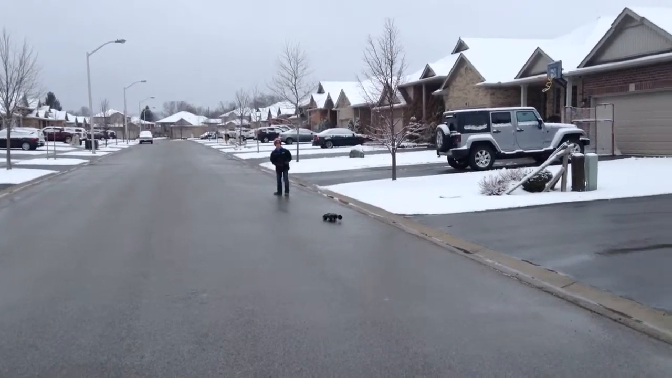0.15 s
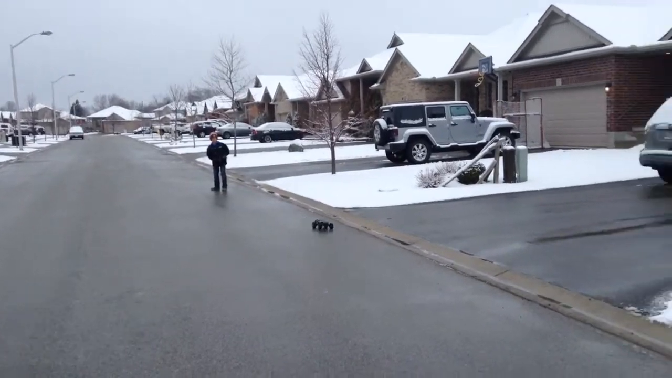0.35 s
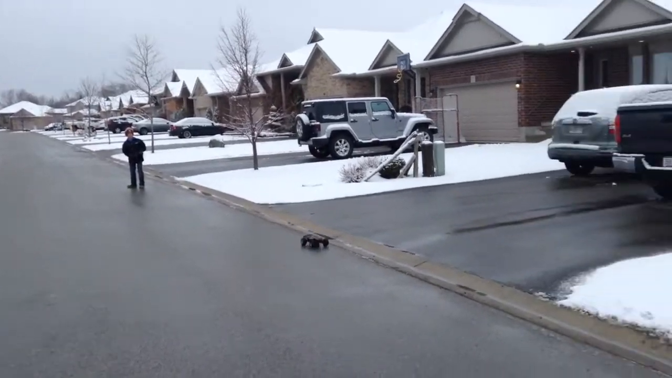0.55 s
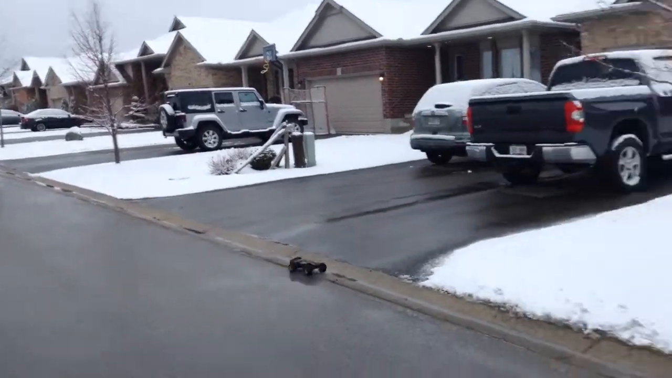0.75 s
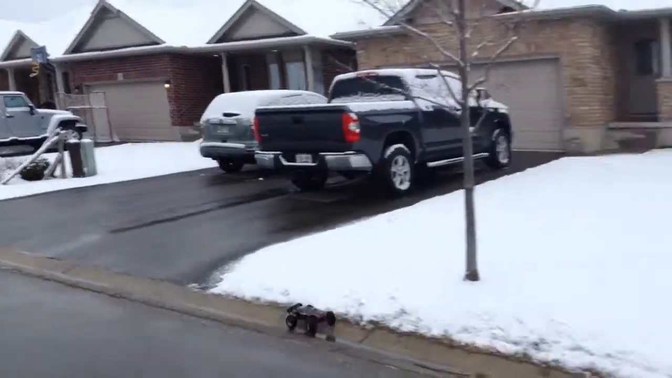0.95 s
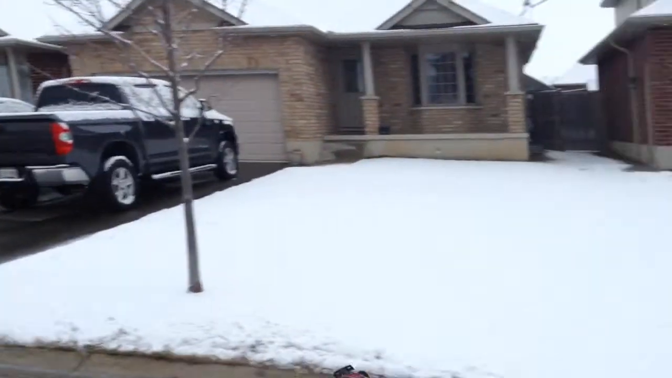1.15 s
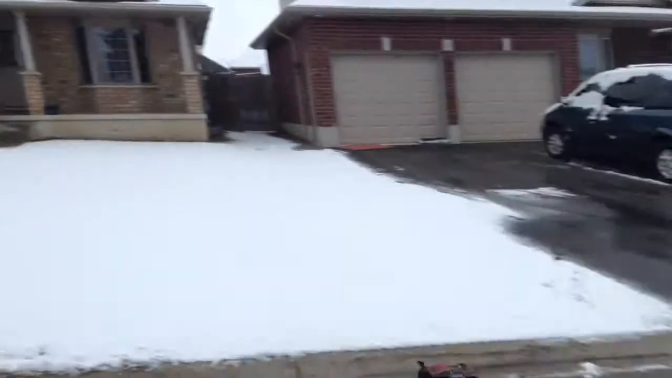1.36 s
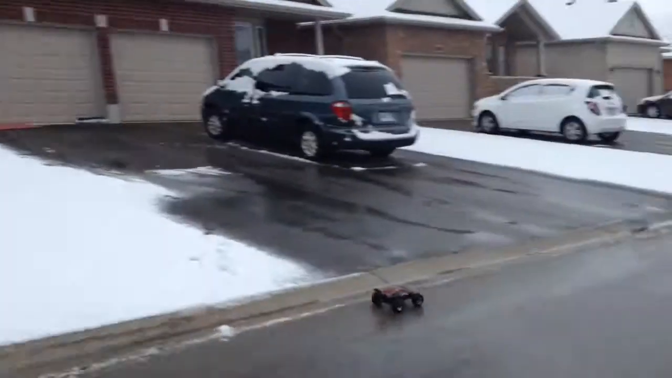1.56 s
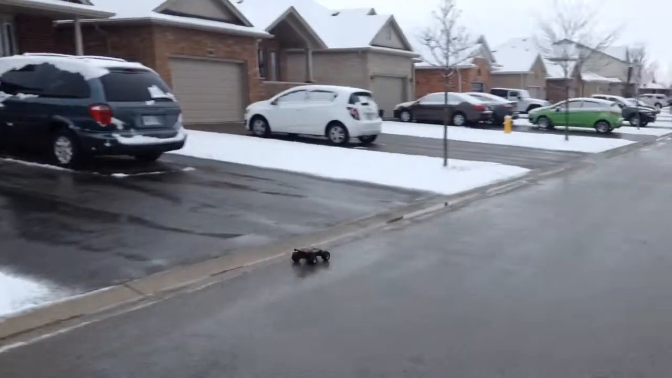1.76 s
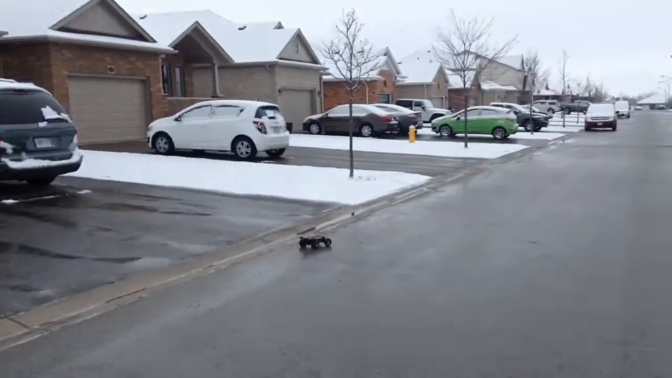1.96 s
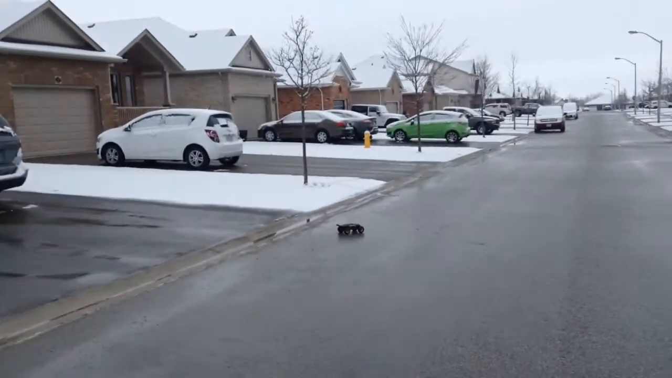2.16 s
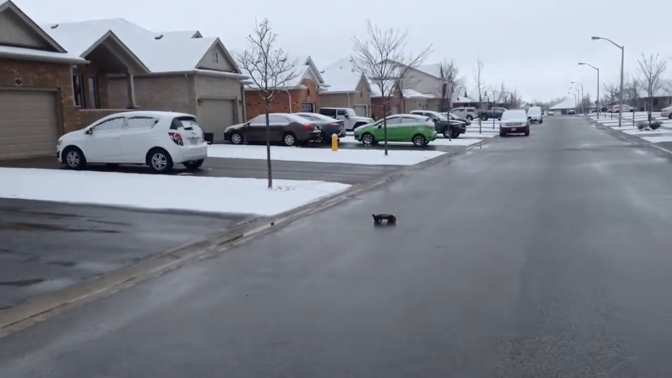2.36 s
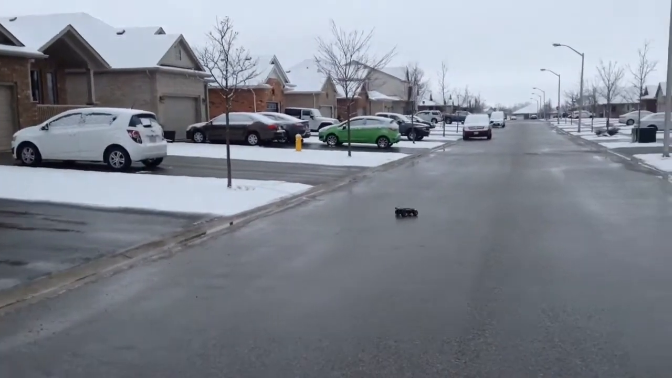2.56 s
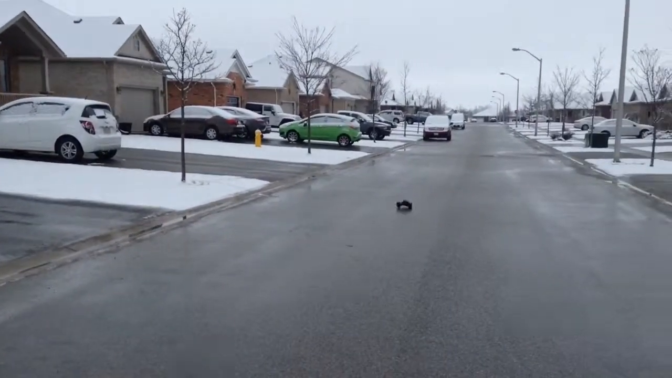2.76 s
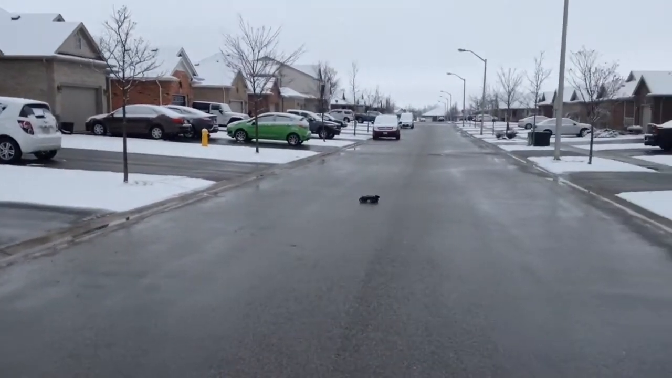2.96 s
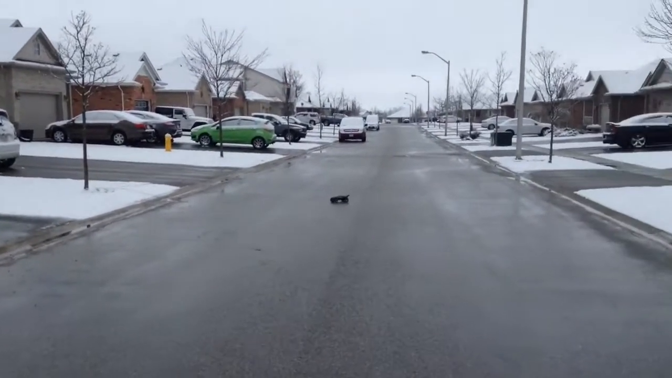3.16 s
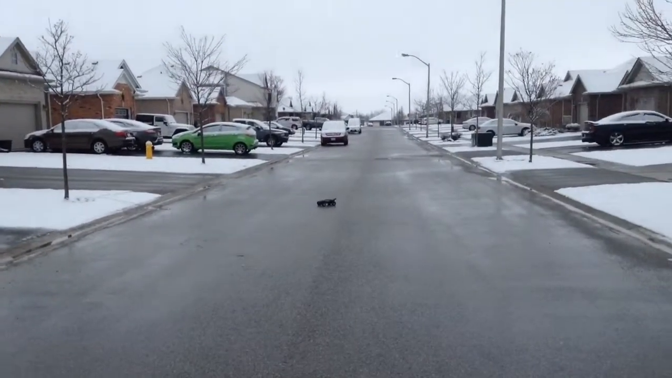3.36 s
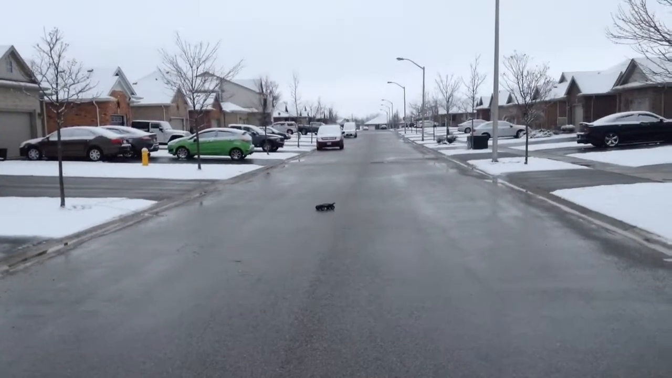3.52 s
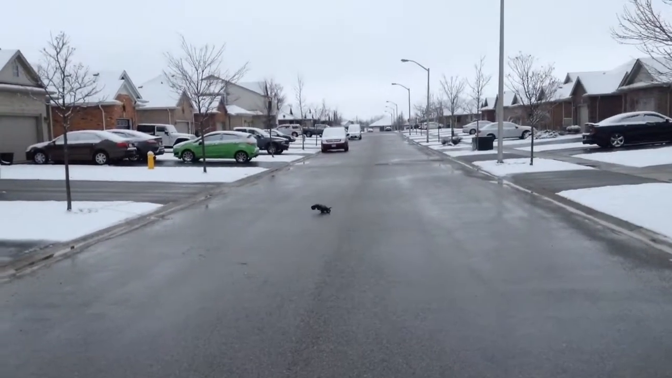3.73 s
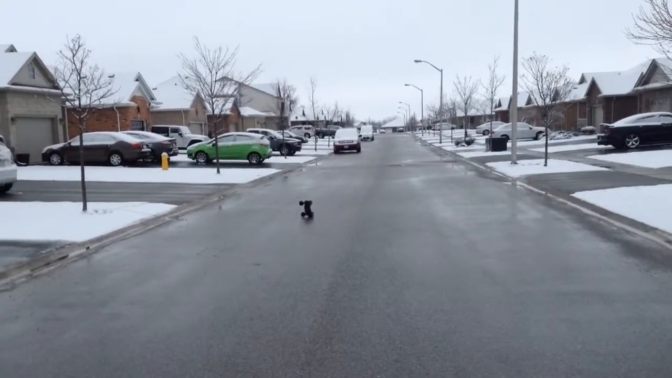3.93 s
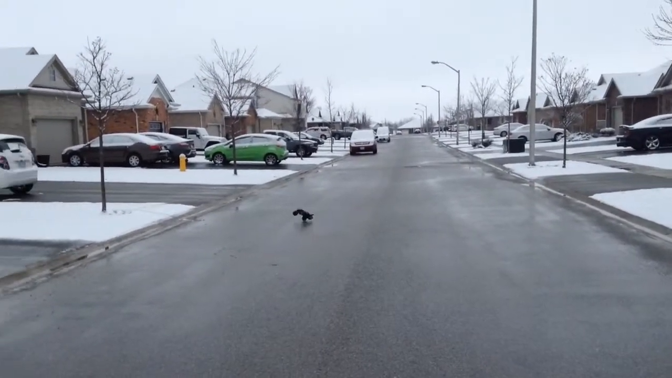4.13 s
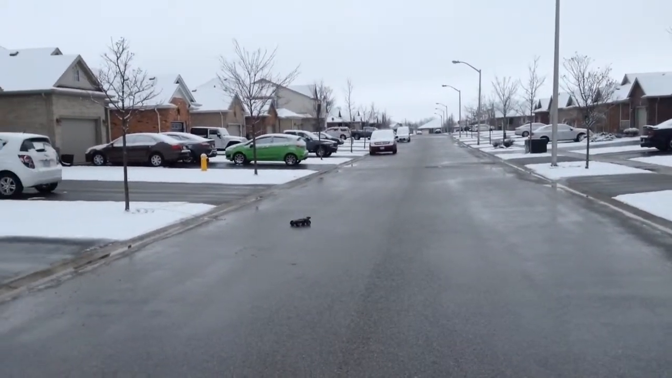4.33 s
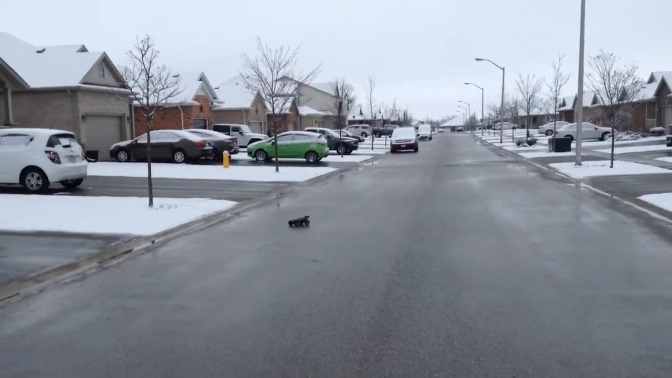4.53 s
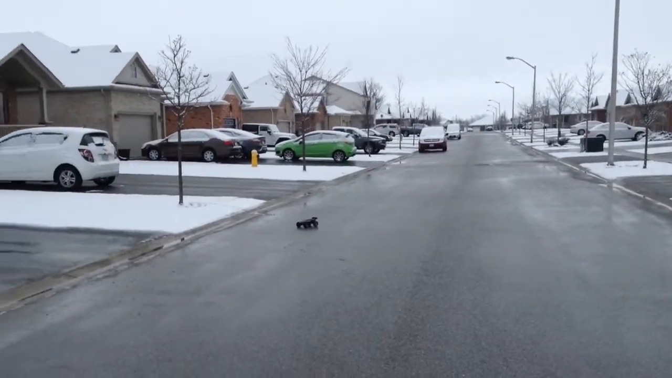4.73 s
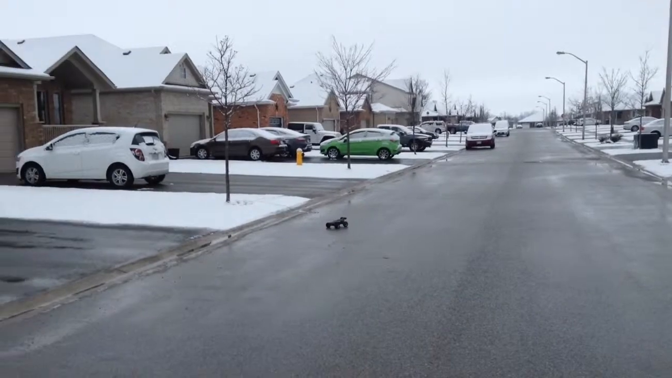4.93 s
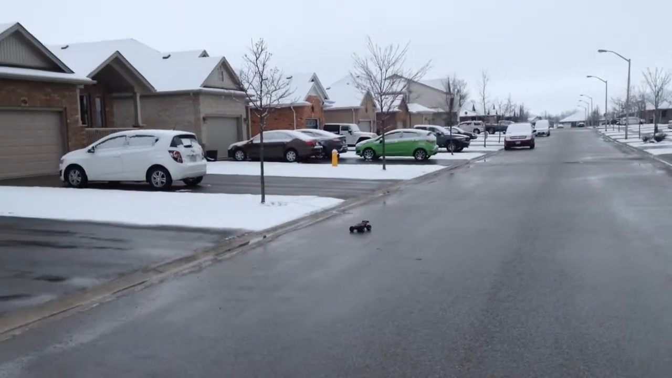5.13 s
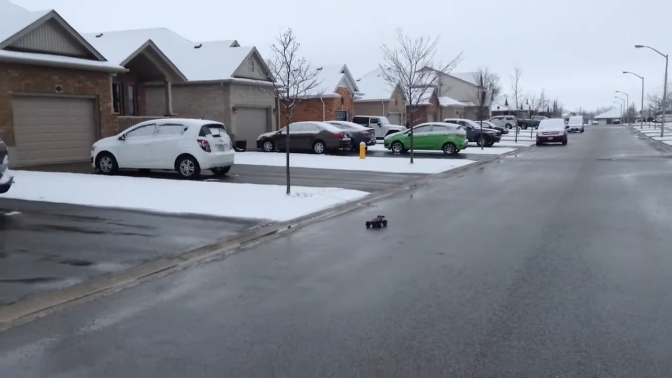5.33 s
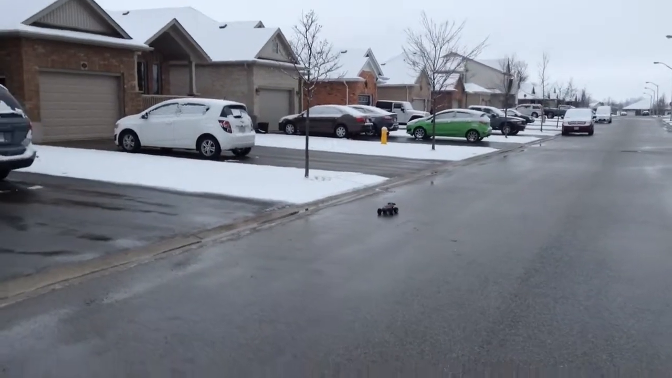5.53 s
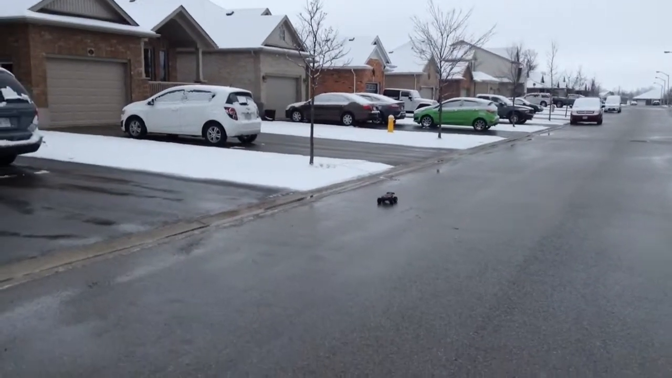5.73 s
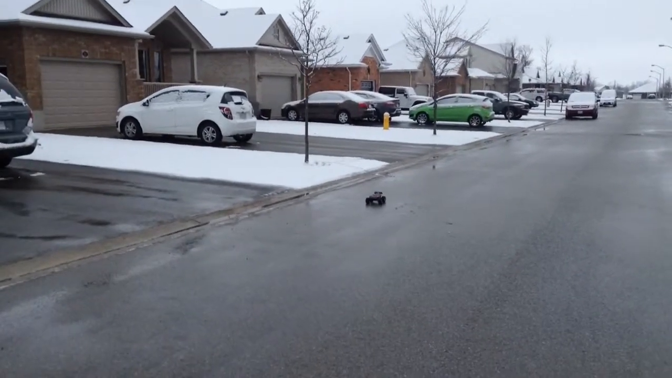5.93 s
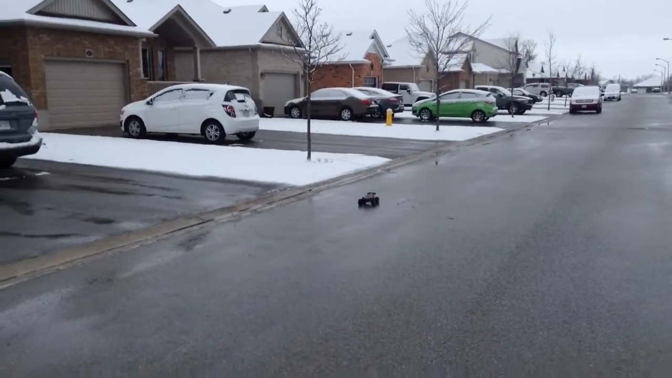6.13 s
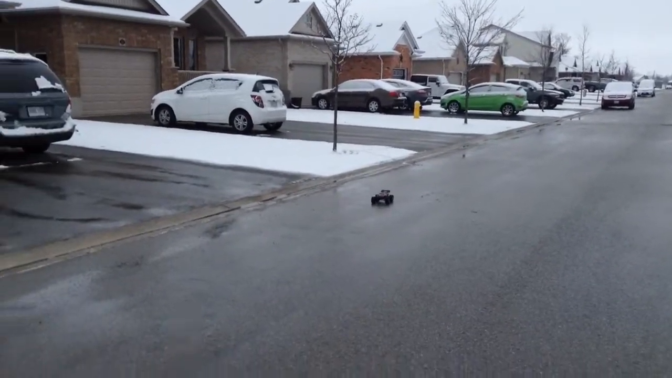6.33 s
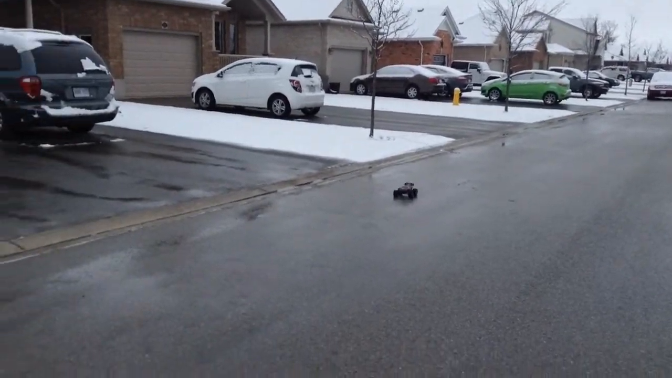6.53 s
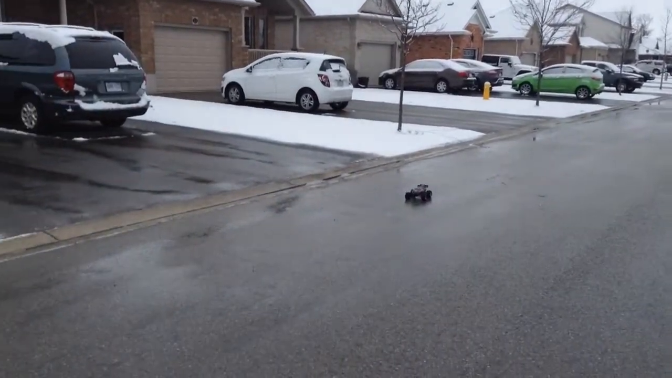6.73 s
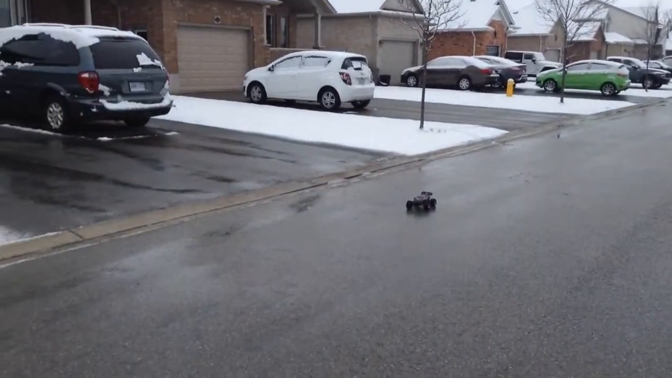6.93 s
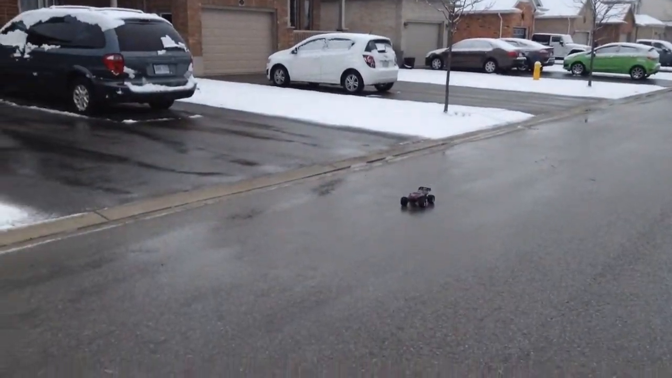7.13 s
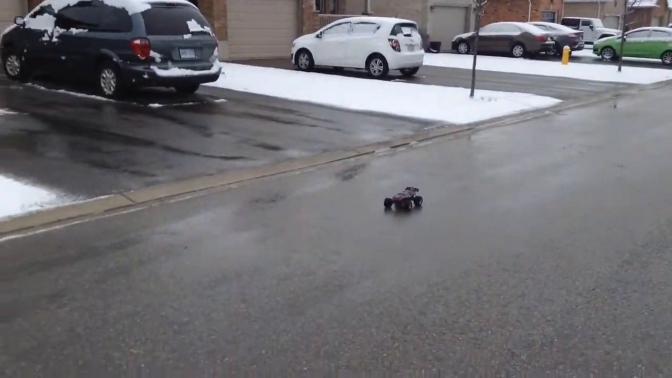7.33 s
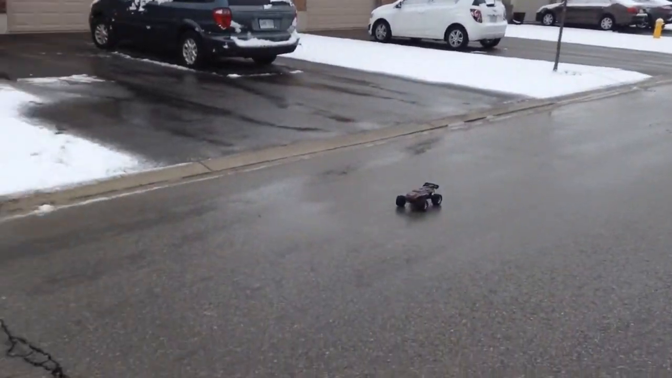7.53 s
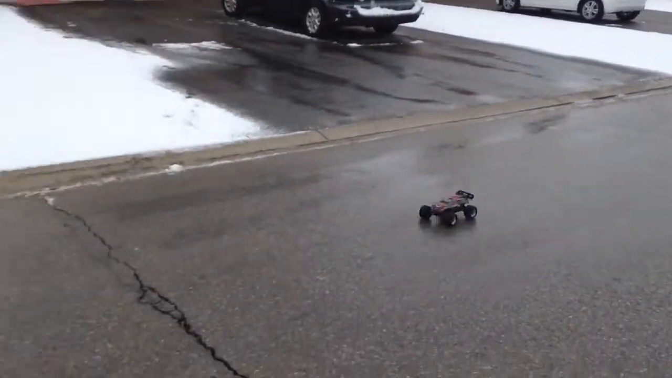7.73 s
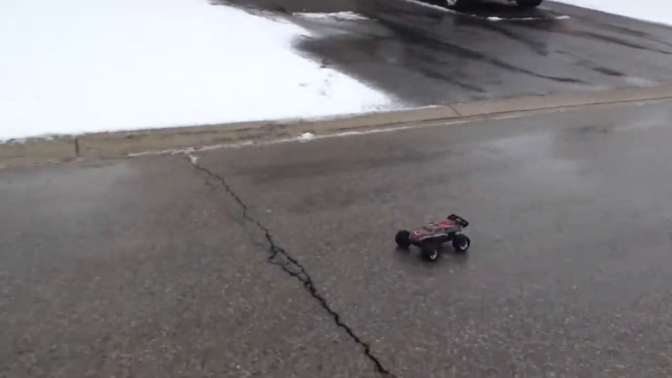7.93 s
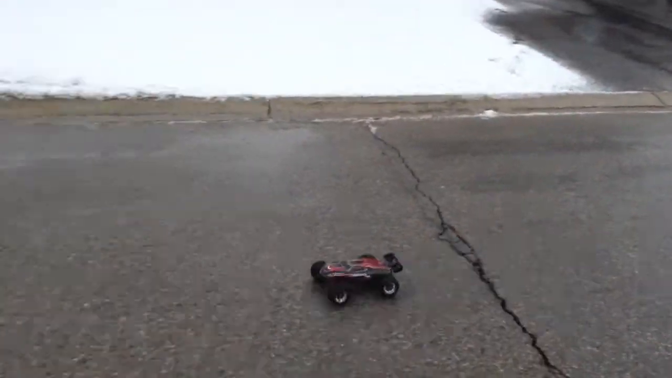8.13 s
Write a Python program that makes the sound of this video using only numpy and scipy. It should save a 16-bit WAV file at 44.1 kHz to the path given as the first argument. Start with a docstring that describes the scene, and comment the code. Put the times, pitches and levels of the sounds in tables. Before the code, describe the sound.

Shrill electric gear whine with hissing wet tyres races by, fades, screams briefly into a clattering tumble, rattles round, then rises again as it returns.

```python
"""A remote-controlled truck races past on a wet street, coasts and brakes, spins up into a flip and lands,
trundles round, then accelerates back towards the microphone. House fronts return a faint echo.
The whine is a sum of gear-tooth tones that follow pitch curves; drone, clatter, rasp and spray are noise
made of tiny impacts that follows the truck's speed, load and how far off it sounds. Knocks and grit are
bursts of noise, thuds and squeaks are brief wavering tones, and slack gears ring through narrow filters."""
import sys
import numpy as np
from scipy import signal
from scipy.fft import rfft, irfft, next_fast_len
from scipy.io import wavfile
from scipy.ndimage import uniform_filter1d

SR = 44100
rng = np.random.default_rng(int(sys.argv[2]) if len(sys.argv) > 2 else 0)


def unload_audio(sound):
    """Save the sound as a 16-bit wav file, at the path given as the first command line argument."""
    columns = np.transpose(np.atleast_2d(sound))
    # keep every value between -1 and 1, then stretch to whole-number steps
    steps = np.round(np.clip(columns, -1, 1) * 32767)
    wavfile.write(sys.argv[1], SR, steps.astype(np.int16))


N = 360738
TIME = np.arange(N) / SR  # [s]

# road speed of the truck: (time [s], speed [m/s])
SPEED = [(0, 5.88), (1.1, 7.6), (1.5, 6.74), (2.45, 4.75), (2.7, 3.64), (3.05, 3.5), (3.2, 1.86),
         (3.36, 0.73), (3.6, 0.7), (3.85, 6.73), (4.02, 4.33), (4.15, 2.5), (4.6, 1.59), (5.3, 1),
         (5.7, 0.86), (6, 3.6), (7.05, 4.38), (7.4, 6.14), (8.18, 8.55)]
# presses of the throttle: (start [s], end [s], load on the gears [0 = none, about 1 = full],
# whine level at the reference remoteness and mesh rate [dB], ease in and out [s])
THROTTLE = [(-.1, .945, .86, -27.8, .011), (.965, 1.145, 0.8, -29, .014), (3.655, 3.899, 1.2, -30, .004),
            (3.917, 4.039, 1.2, -30.5, .011), (5.689, 6.06, 1.2, -37.5, .014),
            (6.06, 7.18, 0.95, -39.5, .04), (7.17, 8.3, 0.76, -32.3, .05)]
# tone of the rattling plastic body: (frequency [Hz], level [dB])
CLATTER_TONE = [(400, -35), (620, -9), (760, -3.5), (860, 1), (1020, 1.5), (1280, 0), (1530, 1.5),
                (1750, -3.5), (2020, 0.5), (2400, -7), (3200, -2.5), (6000, -38.5)]


def amp(db):
    """Turns decibels into an amplitude factor."""
    return 10 ** (np.asarray(db) / 20)


def unit(x):
    """Scales a sound to an average (RMS) level of 1."""
    return x / np.sqrt(np.mean(x ** 2) + 1e-20)


def colour(x, points):
    """Gives a sound a spectrum drawn through (frequency [Hz], level [dB]) points."""
    hz, db = np.transpose(points)
    size = next_fast_len(len(x) + 2048)
    f = np.fft.rfftfreq(size, 1 / SR)
    gain = amp(np.interp(np.log(f + 1), np.log(hz), db))
    return irfft(rfft(x, size) * gain, size)[:len(x)]


def wander(count, hz):
    """Smooth random drift of about unit size that picks a new value hz times a second."""
    steps = np.arange(count) * hz / SR
    knots = rng.standard_normal(count // 16 + 4)
    # a very fast drift holds still once the knots run out
    at, part = np.divmod(np.minimum(steps, len(knots) - 2), 1)
    at = at.astype(int)
    turn = part * np.pi / 2
    return knots[at] * np.cos(turn) ** 2 + knots[at + 1] * np.sin(turn) ** 2


def curve(points):
    """Reads (time [s], value) points at every sample."""
    return np.interp(TIME, *np.transpose(points))


def held(start, end, ease):
    """Rises smoothly to 1 around start and falls back to 0 around end."""
    return (np.tanh((TIME - start) / ease) - np.tanh((TIME - end) / ease)) / 2


def humps(rows):
    """Adds up bell-shaped humps given as (time [s], length [s], height)."""
    return sum(height * np.exp(-((TIME - s) / length) ** 2) for s, length, height in rows)


def add(mix, s, sound):
    """Adds a sound into the mix, starting at s seconds."""
    part = mix[round(s * SR):][:len(sound)]
    part += sound[:len(part)]


def remoteness():
    """How far off the truck sounds, in doublings of a reference value; negative when it sounds nearer."""
    # nearness and heading together: (time [s], how far off it sounds [metres as a loose scale])
    far_off = [(0, 8), (.6, 5.5), (1.1, 2.54), (1.6, 5.74), (2.5, 7.6), (3.5, 11.9), (5.6, 5.8), (7, 10.1),
               (7.6, 5.87), (8.18, 4.36)]
    reference = 4  # on the same loose scale
    return np.log2(np.maximum(curve(far_off), 1) / reference)


def street():
    """Distant town noise, which is shaped random noise, and a faint hum on one steady pitch."""
    # tone of the town: (frequency [Hz], level [dB])
    town_tone = [(30, -30), (70, -19.5), (130, 4.5), (230, 1), (330, -13.5), (600, -16.5), (1000, 6.5),
                 (2500, -25.5), (6000, -25.5), (12000, -26.5), (15000, -36.5)]
    hum_hz, hum_db = 240, -79
    hum = np.sqrt(2) * amp(hum_db + wander(N, hz=7.1)) * np.sin(2 * np.pi * hum_hz * TIME)
    town = amp(-73.5) * unit(colour(rng.standard_normal(N), town_tone))
    return town + hum


def echo(x, t60, delay):
    """House fronts and parked cars scatter a dull tail back: many random reflections that die away."""
    t = TIME[:SR]
    reflections = rng.standard_normal(SR) * (rng.random(SR) < 1500 / SR)  # about 1500 a second
    taps = reflections * (t > delay) * amp(-60 * t / t60)
    tail = signal.fftconvolve(x, taps / np.linalg.norm(taps))[:N]
    return colour(tail, [(150, -4.5), (1000, 0.0), (4500, -3.0), (7000, -22.5), (14000, -29.5)])


def swell(s, db, length, hz, spread):
    """A brief bump of sound around a wavering pitch, loudest at s; returns (start [s], sound)."""
    t = TIME[:SR // 3] - 1 / 6
    pitch = hz * np.exp(spread * np.tanh(wander(len(t), hz=hz)))
    turns = np.cumsum(pitch) / SR
    return s + t[0], amp(db) * np.exp(-(t / length) ** 2) * np.sin(2 * np.pi * turns)


def swells():
    """Swells whose pitch wavers widely thud; those that waver narrowly squeak."""
    # dull thuds, from puffs of air at the microphone to the shell landing:
    # (time [s], level [dB], length [s], centre [Hz])
    thuds = [(1.111, -18.5, 0.0029, 235.3), (1.1, -45, 0.032, 162.5), (1.622, -34, 0.0066, 188),
             (1.67, -46, 0.025, 148), (1.703, -30.5, 0.0088, 194), (3.53, -62, 0.023, 151),
             (4.007, -36.5, 0.035, 1094), (4.013, -29.5, 0.024, 789), (4.019, -42, 0.024, 498),
             (4.08, -42, 0.037, 1014), (5.95, -46, 0.032, 280)]
    # squeaks of the drive line at a crawl and in the wheelspin:
    # (time [s], level [dB], centre [Hz], length [s])
    squeaks = [(3.305, -56, 994, .02), (3.329, -64, 2200, .012), (3.352, -73, 4380, 0.021),
               (3.365, -60, 1504, 0.031), (3.422, -71, 4380, 0.017), (3.787, -39.5, 2340, .016),
               (3.843, -33.5, 2230, 0.011), (3.885, -37, 2190, .014), (4.395, -54, 1560, .022),
               (4.44, -55, 2090, 0.0094), (5.005, -53, 804, .012), (5.03, -51, 1105, 0.027),
               (5.165, -58.5, 1485, 0.065), (5.35, -57.5, 1160, .015), (5.53, -55, 1135, .014)]
    thud_width_hz = 88  # roughly how far the pitch may stray
    squeak_spread = 0.034  # the same, as a share of the pitch
    out = np.zeros(N)
    for s, db, length, hz in thuds:
        add(out, *swell(s, db, length, hz, thud_width_hz / hz))
    for s, db, hz, length in squeaks:
        add(out, *swell(s, db, length, hz, squeak_spread))
    return out


def blow(db, body_db, rise, t60):
    """One blow sets the plastic shell and suspension rattling for a moment: two noises that fade."""
    # tone of the hard rattle: (frequency [Hz], level [dB])
    knock_tone = [(300, -57), (900, -6), (2000, -14), (3200, -3.5), (5000, 9), (7000, 1.5), (10000, -3.5),
                  (15000, -29)]
    t = TIME[:SR // 5]
    rattle, body = rng.standard_normal((2, len(t)))
    fade = (1 - np.exp(-(t / rise) ** 2)) * amp(-60 * t / t60)
    return amp(db) * fade * (unit(colour(rattle, knock_tone)) + amp(body_db) * unit(colour(body, CLATTER_TONE)))


def knocks():
    """The chassis knocks on the road; grit ticks much more briefly against the shell."""
    # chassis and tyres on the asphalt: (time [s], level [dB], body near 1 kHz against the treble [dB])
    chassis_hits = [(1.177, -16, -21), (1.215, -13.5, -29), (1.34, -18, -13), (1.495, -22.5, -20),
                    (2.135, -27, -9), (2.279, -27.5, -7.5), (2.554, -36, -7), (2.601, -32.5, -12),
                    (2.646, -32.5, -14), (3.62, -46, 6), (3.916, -22.5, -7.5), (3.936, -27, -10),
                    (3.959, -25, -12), (3.992, -21.5, -2), (4.017, -24.5, -0.5), (4.095, -38, 7),
                    (4.155, -35, -8), (4.309, -33, -4.5), (4.432, -42.5, -5), (4.578, -49, -2),
                    (4.71, -53, -4), (5.003, -51, -7), (5.681, -43.5, 1), (6.645, -42.5, 6),
                    (6.688, -40.5, -3)]
    # bits of grit flicked against the shell: (time [s], level [dB])
    grit = [(3.103, -35), (3.292, -49), (3.917, -33), (3.978, -22), (5.006, -38), (5.063, -46),
            (5.085, -38.5), (5.092, -37), (5.284, -49), (5.296, -44.5)]
    out = np.zeros(N)
    for s, db, body_db in chassis_hits:
        add(out, s, blow(db, body_db, rise=0.0038, t60=0.088))
    for s, db in grit:
        add(out, s, blow(db, body_db=0, rise=0.00048, t60=0.0085))
    return out


def resonate(x, hz, width):
    """Two passes of a peak filter, each width Hz wide, leave a narrow band around one frequency."""
    b, a = signal.iirpeak(hz, hz / width, SR)
    return signal.lfilter(b, a, signal.lfilter(b, a, x))


def controller():
    """Chopped current makes the windings sing just before the rotor gets going, and buzz once it turns."""
    # singing as the motor starts from rest: (frequency [Hz], level [dB])
    stall_tones = [(3050, -52), (6100, -54)]
    stall_s, stall_length_s = 3.652, .026
    tones = sum(amp(db) * np.sin(2 * np.pi * hz * TIME) for hz, db in stall_tones)
    song = np.exp(-((TIME - stall_s) / stall_length_s) ** 2) * tones
    # the buzz comes at part throttle on the way back
    buzz = unit(resonate(rng.standard_normal(N), hz=6010, width=230))
    buzz_gain = held(start=6.1, end=7.7, ease=.3) * amp(-49.5 + 3.5 * wander(N, hz=70))
    return song + buzz_gain * buzz


def ringing(speed, modes, steady):
    """Slack in the drive line rattles a set of modes: single chinks at a crawl, a blur at speed."""
    rattles_per_m, rattle_s = 30, .006
    per_sample = rattles_per_m * speed / SR
    chinks = rng.exponential(1, N) * (rng.random(N) < per_sample) / per_sample
    keep = np.exp(-1 / (rattle_s * SR))  # each chink dies away over rattle_s
    rattle = np.sqrt(steady + signal.lfilter([1 - keep], [1, -keep], chinks))
    out = np.zeros(N)
    for hz, width, db in modes:
        mode = resonate(rattle * rng.standard_normal(N), hz, width)
        out += amp(db) * unit(mode * amp(2.5 * wander(N, hz=14)))
    return out


def trundling():
    """Slowing down and after the landing, the slack gears ring in narrow bands as the truck rolls."""
    # rolling with slack gears: (start [s], end [s], gain at 1 m/s [dB])
    slack_spells = [(2.7, 3.3, -65.5), (4.2, 5.68, -66.5)]
    # what the slack gears ring with: (frequency [Hz], width of each filter pass [Hz], level [dB])
    slack_rings = [(925, 110, -1), (1110, 90, -2), (1480, 90, -2), (2060, 240, -5), (2740, 240, -7),
                   (3370, 280, -7), (3830, 260, -8), (4360, 300, -9), (4900, 400, -8)]
    speed = np.maximum(curve(SPEED), .1)
    slack = sum(amp(db) * held(start, end, ease=.08) for start, end, db in slack_spells)
    return slack * np.sqrt(speed) * ringing(speed, slack_rings, steady=3)


def grains(spectrum, per_s, share, spread_db):
    """A wash of countless tiny impacts with larger single ones among them."""
    size = amp(spread_db * np.minimum(rng.exponential(1, N), 4)) * rng.choice([-1, 1], N)
    ticks = unit(size * (rng.random(N) < per_s / SR))
    wash = rng.standard_normal(N)
    return unit(colour(np.sqrt(share) * ticks + np.sqrt(1 - share) * wash, spectrum))


def rolling():
    """Tread, body, gear backlash and water follow speed, remoteness and load, and shake as the truck jolts."""
    # tones of tyre drone, gear rasp and water spray: (frequency [Hz], level [dB])
    drone_tone = [(30, -36.5), (70, -46), (120, -26), (210, -7.5), (290, -7.5), (370, -6), (450, -1),
                  (520, 5), (640, 1), (900, -6.5), (1500, -29)]
    rasp_tone = [(1500, -46), (2400, -5), (3000, -8.5), (3700, -1), (4300, 1.5), (5100, 1), (5600, 0.5),
                 (6400, -6), (7000, -7), (8500, -9), (13000, -42)]
    spray_tone = [(3500, -42.5), (6000, 3.5), (7800, 0.5), (9000, -0.5), (11000, -2), (12500, -3),
                  (14000, -11.5), (15300, -26)]
    # ringing of gearbox and shell:
    # (frequency [Hz], width of each filter pass [Hz], level against the rasp [dB])
    rings = [(1555, 120, -15.5), (1940, 200, -16), (2320, 180, -20), (2740, 230, -15.5), (3350, 260, -11.5),
             (3740, 300, -10), (4280, 330, -10.5), (4930, 380, -9), (6950, 400, -17), (8050, 700, -13)]
    # how each noise follows the truck, before any shaking: (level at the reference speed and remoteness [dB],
    # rise per doubling of speed [dB], loss per doubling of remoteness [dB], rise per unit of gear load [dB],
    # share of a bump's dB)
    drone_law = (-35.5, 12, 2.5, -7, 1)
    clatter_law = (-33.5, 7.5, 6, -1, 1.61)
    rasp_law = (-32, 11.5, 3, 3, 0.72)
    spray_law = (-24, 18.5, 6.5, 4, 0.58)
    # rough patches, landings and braking that make the rolling louder, or moments that make it softer:
    # (time [s], length [s], level [dB])
    bumps = [(.69, 0.068, 0.5), (.865, 0.037, 3.5), (1.08, 0.051, 2.5), (1.25, 0.021, 3.5),
             (2.92, 0.21, 3.5), (4.01, 0.079, 8.5), (4.21, 0.036, -5.5), (4.27, 0.04, 7.5),
             (5.945, 0.028, 4.5), (6.672, 0.044, 4), (8.13, 0.081, 3)]
    # moments with the wheels off the ground: (time [s], length [s], level [dB])
    hops = [(1.174, 0.019, -6), (1.201, 0.0052, -5), (3.907, 0.008, 0)]
    # the tyres drone less as the truck rears up: (time [s], length [s], level [dB])
    wheelie = (3.87, 0.13, -5)
    reference_speed = 8  # [m/s]
    launch_db, launch_speed = 14.5, 1.6  # well below this speed [m/s] a pulling drive line grinds louder
    steadying = .25  # share of the jolting lost per unit of load

    speed = np.maximum(curve(SPEED), .1)
    load = sum(share * held(start, end, ease) for start, end, share, _, ease in THROTTLE)
    controls = np.array([np.ones(N), np.log2(speed / reference_speed), -remoteness(), load, humps(bumps)])
    levels = np.array([drone_law, clatter_law, rasp_law, spray_law]) @ controls + humps(hops)
    drone_db, clatter_db, rasp_db, spray_db = levels
    launch_gain_db = launch_db * load / (1 + (speed / launch_speed) ** 4)
    jolt, chatter = wander(N, hz=45.66), wander(N, hz=319.0)
    lurch_db = 0.61 * wander(N, hz=8.9) / (1 + (speed / 3) ** 2)  # slow rolling is uneven
    shake_db = 1.2 * (1 - steadying * load) * (jolt + chatter) + lurch_db

    tread = grains(drone_tone, per_s=300, share=0.62, spread_db=-0.5)
    body = grains(CLATTER_TONE, per_s=700, share=0.22, spread_db=4.0)
    backlash = grains(rasp_tone, per_s=1800, share=0.14, spread_db=8.5) + ringing(speed, rings, steady=.4)
    water = grains(spray_tone, per_s=4200, share=0.24, spread_db=7.0)
    drone = amp(drone_db + humps([wheelie]) + 1.8 * jolt) * tread
    clatter = amp(clatter_db + 0.44 * launch_gain_db + 0.584 * shake_db) * body
    rasp = amp(rasp_db + launch_gain_db + shake_db) * backlash
    spray = amp(spray_db + shake_db) * water
    return drone + clatter + rasp + spray


def whine(pitch, drive, partials, wobble, throb, jitter, rough, teeth_per_wheel,
          snatch=((0, 1), (9, 1)), stutter=0, patchy_db=2):
    """Gear teeth mesh in bursts that sag in pitch, twice a wheel turn; backlash blurs the partials.

    The spur gear can stutter within each burst. The whine grows with drive and mesh rate, fades with
    remoteness, and a partial flares where it meets a gearbox resonance."""
    # how the gearbox answers, with high peaks near 1.9 and 6 kHz: (frequency [Hz], level [dB])
    gearbox = [(1000, 4.5), (1400, 3), (1750, -1), (1910, 14), (2080, 2), (2300, -3), (2500, 1), (2800, 2),
               (3200, 0), (3520, 5), (3850, 2), (4120, -3), (4500, 3.5), (4750, 1), (5050, 5), (5400, 7),
               (5950, 13), (6450, 8), (6900, 5), (7600, 10), (9000, 0)]
    reference_mesh_hz, db_per_octave = 4000, 5.5
    pinion_teeth, spur_teeth = 7, 26

    running = (TIME >= pitch[0][0]) & (TIME <= pitch[-1][0]) & (drive > drive.max() / 100)
    hz, flutter, count = curve(pitch)[running], curve(snatch)[running], running.sum()
    heard_drive = (drive / 2 ** remoteness())[running]
    gain = heard_drive * amp(db_per_octave * np.log2(hz / reference_mesh_hz))

    # angle of the wheel, and of the meshing teeth, in radians
    wheel = 2 * np.pi * np.cumsum(hz * (1 + .05 * wander(count, hz=12))) / SR / teeth_per_wheel
    load = .5 * np.sin(wheel) - np.sin(2 * wheel) + .25 * np.sin(4 * wheel)
    bent_hz = hz * (1 + wobble * flutter * load + jitter * wander(count, hz=262.4))
    mesh = 2 * np.pi * np.cumsum(bent_hz) / SR

    out = np.zeros(count)
    for multiple, partial_db, width, coupling in partials:
        partial_hz = multiple * hz
        gearbox_db = coupling * np.interp(partial_hz, *np.transpose(gearbox))
        # a random walk in phase widens the tone
        blur = np.cumsum(rng.standard_normal(count) * np.sqrt(2 * np.pi * width * partial_hz / SR))
        blur = uniform_filter1d(blur, size=28)
        air_db = -np.maximum(partial_hz - 11000, 0) / 400  # the highest partials do not carry
        sway_db = patchy_db * wander(count, hz=45)
        out += amp(partial_db + air_db + sway_db + gearbox_db) * np.cos(multiple * mesh + blur)

    # an off-centre gear adds sidebands
    pinion = 1 + 0.25 * np.cos(mesh / pinion_teeth + wander(count, hz=87.7))
    bursts = throb * (np.cos(2 * wheel) - .35 * np.cos(4 * wheel))
    spur = stutter * flutter * np.cos(mesh / spur_teeth + wander(count, hz=60))
    grip = unit(pinion * np.exp(bursts + spur + rough * wander(count, hz=507.0)))
    sound = np.zeros(N)
    soft_ends = signal.windows.tukey(count, 300 / count)
    sound[running] = np.sqrt(2) * gain * out * grip * soft_ends
    return sound


def motor():
    """The gears sing differently with each press of the throttle, and freewheel after the first pass.

    A high-pass filter keeps the whine free of bass."""
    # gear-mesh rate in the three runs, and sagging off the throttle: (time [s], mesh rate [Hz])
    fly_by = [(0, 3525), (.08, 3460), (.19, 3850), (.25, 4020), (.3, 3880), (.345, 3570), (.37, 3750),
              (.56, 4220), (.6, 4070), (.78, 4280), (.85, 4520), (.88, 4400), (.98, 4680), (1.056, 5050),
              (1.11, 5040), (1.17, 4700)]
    coast = [(1.28, 4460), (1.38, 4200), (1.6, 3975), (2.1, 3720)]
    flip = [(3.655, 750), (3.668, 870), (3.69, 1750), (3.705, 2500), (3.72, 2950), (3.733, 3080),
            (3.748, 3800), (3.762, 4100), (3.79, 5085), (3.807, 4350), (3.835, 5900), (3.846, 6300),
            (3.862, 5300), (3.872, 5850), (3.893, 6130), (3.902, 5400), (3.96, 5150), (4.04, 4300)]
    way_back = [(5.68, 2200), (5.69, 1950), (5.705, 830), (5.72, 1070), (5.745, 1110), (5.775, 1370),
                (5.875, 1850), (5.915, 1930), (5.97, 2250), (6.05, 2480), (6.2, 2730), (6.6, 3020),
                (7.12, 3540), (7.5, 4780), (7.8, 5950), (7.91, 6100), (8.02, 6560), (8.055, 7080),
                (8.18, 7200)]
    # partials of the gear train in each state: (multiple of the mesh rate, level [dB],
    # width [share of the partial's frequency], coupling to the gearbox [0-1])
    loaded = [(.33, -21, .05, 0), (.43, -17, .035, 0), (.86, -16, .04, 0), (1, -2.2, .005, 1),
              (1.15, -10, .04, 0), (1.35, -3.5, .06, 0), (2, -3, .016, .25), (2.8, -1, .026, 0)]
    freewheel = [(.25, 1, 0.0406, 0), (.68, -8, .015, 0), (1, -3, 0.051, 0), (1.56, 3.5, 0.0318, 0),
                 (2.251, -1, .1, 0)]
    spinning_up = [(.36, -15, .02, 0), (.485, -15, .04, 0), (1, 2, .006, 1), (2, -2, .012, .6),
                   (3, -7.5, .014, .6), (4, -14, .02, .6)]
    skidding = [(.2, -8, .025, 0), (.6, -8, .04, 0), (1, 0, .03, 0)]
    launching = [(1, -4, .01, 1), (2, -2, .014, .3), (3, -3, .008, .6), (4, -9, .014, .7),
                 (5, -15, .03, .7), (6, -21, .03, .7)]
    cruising = [(1, -.8, .028, 1), (2, -9, .04, .4), (3, -13, .04, 0)]
    pulling = [(.345, -15, .014, .25), (.485, -9, .015, .25), (1, 2, .01, .92), (1.15, -12, .04, 0),
               (1.48, -7, .06, 0), (2, -.5, .012, 0), (2.48, -9, .025, 0), (3, -11, .02, 0)]
    # the whine of the first pass dips briefly: (time [s], length [s], level [dB])
    dips = [(.2, .045, -3), (.58, .045, -5)]
    # how hard the drive line snatches on the way back: (time [s], flutter [factor])
    snatch = [(7.1, .45), (7.5, .7), (7.65, 1.1), (7.78, 1.2), (7.87, .8), (7.92, .35), (8.18, .5)]

    presses = [amp(db) * held(start, end, ease) for start, end, _, db, ease in THROTTLE]
    race, sprint, spin_up, skid, restart, cruise, approach = presses
    # off the throttle the whine swells briefly and dies away: peak [s], level [dB], slopes [dB/s]
    peak_s, peak_db, rise_db_per_s, fade_db_per_s = 1.376, -37.5, 74.5, 21
    since = TIME - peak_s
    overrun = amp(peak_db + np.minimum(rise_db_per_s * since, -fade_db_per_s * since))

    out = whine(fly_by, (race + sprint) * amp(humps(dips)), loaded, wobble=.006, throb=.18,
                jitter=.007, rough=.28, teeth_per_wheel=255, patchy_db=2.2)
    out += whine(coast, overrun, freewheel, wobble=.005, throb=.3,
                 jitter=.004, rough=.3, teeth_per_wheel=215)
    out += whine(flip, spin_up, spinning_up, wobble=.007, throb=.3,
                 jitter=.013, rough=.3, teeth_per_wheel=130, stutter=.25, patchy_db=1.5)
    out += whine(flip, skid, skidding, wobble=.01, throb=.3,
                 jitter=.015, rough=.4, teeth_per_wheel=255)
    out += whine(way_back, restart, launching, wobble=.015, throb=.25,
                 jitter=.013, rough=.35, teeth_per_wheel=130, patchy_db=3)
    out += whine(way_back, cruise, cruising, wobble=.018, throb=.35,
                 jitter=.016, rough=.35, teeth_per_wheel=255)
    out += whine(way_back, approach, pulling, wobble=.026, throb=.55,
                 jitter=.014, rough=.25, teeth_per_wheel=262, snatch=snatch, stutter=.5, patchy_db=1)
    no_bass = signal.butter(N=3, Wn=600, btype="high", fs=SR, output="sos")
    return signal.sosfilt(no_bass, out)


def scene():
    """The truck, its echo and the street, alike in both channels."""
    truck = swells() + knocks() + controller() + trundling() + rolling() + motor()
    mix = street() + amp(-11.5) * echo(truck, t60=.7, delay=0.02) + truck
    return np.tile(mix, (2, 1))


def record(dry):
    """One microphone on both channels, with a wind filter, rounded peaks and a steep band limit."""
    wind_filter = signal.butter(N=3, Wn=85, btype="high", fs=SR, output="sos")
    thin = signal.sosfilt(wind_filter, dry)
    rounded = thin / (1 + (thin / .72) ** 4) ** .25  # peaks bend over towards .72
    band_limit = signal.firwin(801, 15350, window=("kaiser", 9), fs=SR)  # lets through up to 15350 Hz
    return signal.oaconvolve(rounded, band_limit[None], "same", axes=1)


dry = scene()
out = record(dry)
unload_audio(out)
```